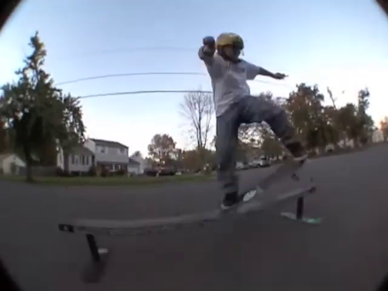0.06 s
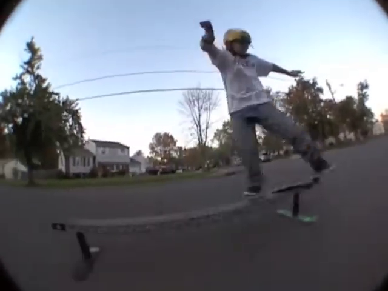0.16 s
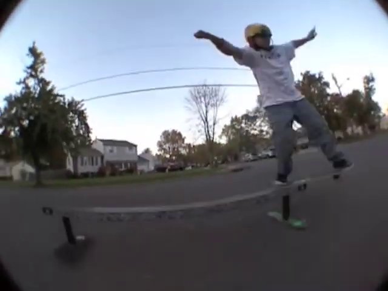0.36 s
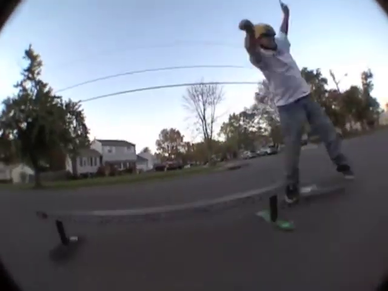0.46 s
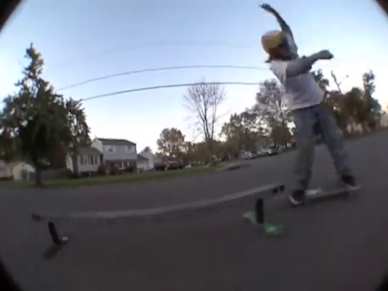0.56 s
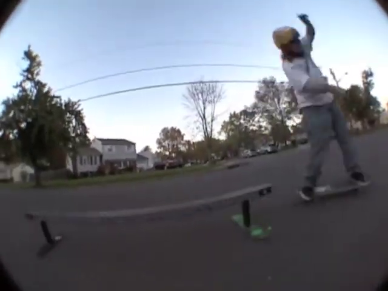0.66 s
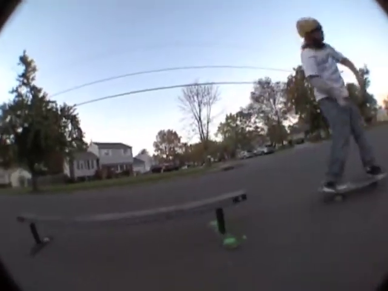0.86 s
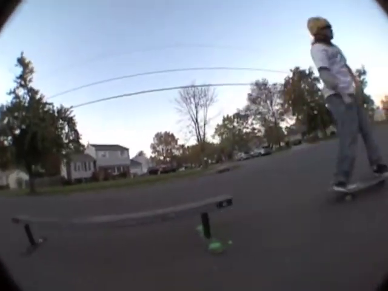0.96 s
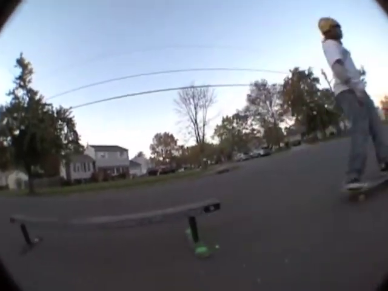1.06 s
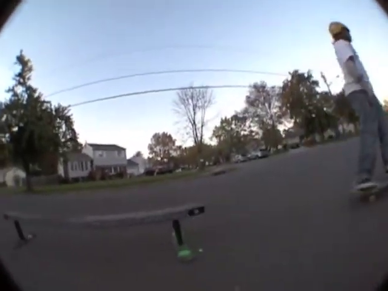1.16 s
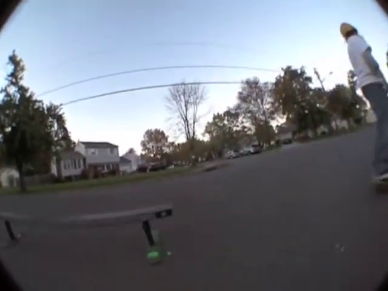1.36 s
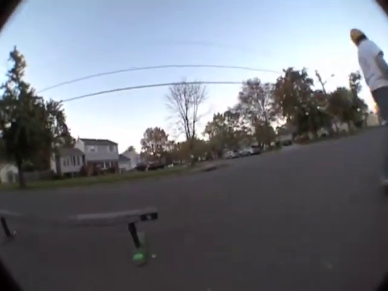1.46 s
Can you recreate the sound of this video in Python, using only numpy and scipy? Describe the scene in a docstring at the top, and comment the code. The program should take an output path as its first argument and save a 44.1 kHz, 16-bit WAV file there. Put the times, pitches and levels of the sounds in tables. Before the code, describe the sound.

A skateboard pops onto a steel rail with a woody knock, scrapes and squeals along it, then lands with a loud clatter. The rail rings on as the wheels roll away over rough asphalt on an open street.

```python
"""A woody knock sounds as a skateboard pops up onto a steel rail; it scrapes along, squealing where it
sticks. Two hollow thumps follow, then it slams off the end and lands with a clatter that overloads the
microphone. The rail rings on in its normal modes while the wheels roll away to the right over rough
asphalt. Friction and impact excite the steel and the deck; the street returns thin echoes."""
import sys
import numpy as np
from scipy import signal
from scipy.fft import rfft, irfft
from scipy.io import wavfile

SR = 44100
rng = np.random.default_rng(int(sys.argv[2]) if len(sys.argv) > 2 else 0)


def master_out(mix):
    """Clip the mix to full scale and print it as 16-bit PCM to the path in sys.argv[1]."""
    frames = np.transpose(np.atleast_2d(mix))
    ceiling = np.clip(frames, -1, 1)
    pcm = np.round(ceiling * 32767).astype(np.int16)
    wavfile.write(sys.argv[1], SR, pcm)


N = 66150
T = np.arange(N) / SR

# Levels are relative within each table.
# Scrapes on the rail; clatter of the landing: t/s, length/s, level/dB, change over length/dB, treble/dB
SCRAPES = [(.165, 0.023, -33.5, 9, -12), (.186, 0.026, -17, -2.5, -4.5), (.213, 0.014, -10.5, 1, 2.5),
           (.232, 0.017, -12, -3, 1), (.246, 0.029, -18.5, 7, 0), (.276, 0.016, -20, -11, 6),
           (.287, 0.05, -25, -7, 3), (.327, 0.0094, -17, 7, 3.5), (.343, 0.018, -18, 3.5, 3.5),
           (.3585, 0.015, -14, -4.5, 8.5), (.372, 0.035, -23.5, -1.5, 7.5), (.424, 0.04, -18.5, -1, 0),
           (.473, 0.074, -23, -6.5, -2)]
CLATTER = [(.5602, 0.037, -3.5, -5, 4.5), (.604, 0.056, -13, 0, 6), (.673, 0.028, -12.5, 3.5, -1.5),
           (.709, 0.034, -17, -7, 3)]
# Resonances of the sliding metal truck: f/Hz, bandwidth/Hz, gain/dB
TRUCK_RESONANCES = [(2860, 72, -2.5), (3210, 110, -6.5), (3660, 93, -8), (4450, 44, 0), (6120, 90, 5.5),
                    (6770, 110, -3), (7580, 150, -6), (8870, 250, -3.5), (9630, 96, 4.5),
                    (11700, 400, -10.5)]
# Strong modes of the rail: f/Hz, T60/s, gain when scraped/dB, gain when slammed/dB
RAIL_MODES = [(510, 1.1, -26, -25), (533, .7, -27, -31), (697, 1.0, -25, -28), (731, .9, -27, -20),
              (790, .3, -23, -28), (812, .25, -23, -34), (851, 1.1, -22, -19), (905, 1.1, -28, -23),
              (947, .75, -17, -17), (1018, 1.5, -31, -27), (1262, .6, -25, -24), (1431, .22, -18, -15),
              (1621, 1.7, -31, -26), (1801, .6, -25, -16.5), (1955, 1.3, -30, -28), (1986, 1.3, -25, -18),
              (2013, .9, -24, -25), (2044, .7, -28, -21), (2083, .35, -20, -15), (2194, .4, -22, -13),
              (2335, .4, -21, -21), (2386, .65, -20, -19), (2500, .55, -19, -18), (2724, .3, -23, -20),
              (2978, .7, -25, -23), (3161, .25, -20, -21), (3528, .3, -25, -20), (4248, .45, -30, -24)]
# Spectrum of the rail's weak modes: f/Hz, level/dB
SHIMMER_SPECTRUM = [(100, -42), (400, -38), (700, 1), (1500, 3.5), (2200, -2.5), (3100, 1), (4300, -1),
                    (5500, 4.5), (15000, -1)]
# Their decay: f/Hz, T60/s
SHIMMER_DECAY = [(500, 1.02), (2000, 0.83), (4000, 0.66), (7000, 0.3), (14000, 0.34)]
# Stick-slip notes; one note of the spinning wheels: t/s, length/s, f/Hz, level/dB
SQUEALS = [(0.213, 0.041, 2086, -20.5), (0.324, 0.0094, 3354, -22.5), (.33, 0.1, 1685, -23.5),
           (.345, 0.035, 2614, -29), (.33, 0.032, 2250, -35), (0.341, 0.037, 6510, -31.5),
           (0.492, 0.017, 1427, -24), (0.565, 0.013, 1431, -15.5), (0.568, 0.044, 2194, -19),
           (0.657, 0.024, 2082, -28.5), (0.678, 0.026, 2500, -38)]
WHINE = (-0.1, -0.01, 591, -40)
# Knocks of the deck: t/s, level/dB, treble/dB
KNOCKS = [(0.019, -19, 3), (.120, -32, -2), (0.1646, -20.5, -1.5), (0.232, -14.5, 18.5),
          (0.2801, -19.5, 20), (0.36, -20, 13), (0.5607, -9.5, 8), (.7672, -51, 7.5), (1.0843, -30.5, -2),
          (1.178, -28.5, 1), (1.312, -33.5, -3), (1.3311, -51, -11), (1.3996, -34, -14), (1.46, -36, -17)]
# Hollow thumps of the deck: t/s, level/dB, f/Hz
THUMPS = [(.4732, -8.5, 600), (.4998, -11.5, 517), (.520, -19, 524)]
# Rolling roar: t/s, level/dB, treble/dB, left over right/dB
ROLL = [(0, -35, 4.5, 0), (.15, -38, 0.5, -1.5), (.3, -38, 17, -2), (.54, -26.5, 10, -1), (.72, -41, 2, 0),
        (.9, -37.5, 3, -3), (1.08, -36.5, 6.5, -2.5), (1.22, -35.5, 7.5, -2), (1.36, -39, 4, -4),
        (1.5, -39, -1.5, -2.5)]
# Course of the wheels' drone; single cracks of grit: t/s, level/dB
DRONE = [(0, -55), (.16, -46), (.215, -30), (.32, -54), (.55, -58), (.62, -44), (.85, -43), (1.1, -49),
         (1.28, -46.5), (1.4, -42), (1.5, -43)]
GRIT = [(.862, -41), (0.883, -43), (.992, -47), (1.041, -45), (1.064, -41), (1.086, -47), (1.135, -53),
        (1.402, -43.5), (1.459, -40)]
# Noise spectra of the contacts: f/Hz, spectral level/dB
STEEL_SPECTRUM = [(30, -43), (100, -23.5), (250, -16), (450, -10), (800, -7), (1100, -10), (1600, -6),
                  (2300, -0.5), (3500, 0), (4000, -4.5), (5200, -12), (9800, -14.5), (13500, -19.5),
                  (16000, -39)]
WOOD_SPECTRUM = [(30, -34), (150, -14), (350, -0.5), (520, -4.5), (750, 0.5), (1300, 2.5), (2200, -5.5),
                 (3800, -13.5), (6000, -26.5), (15000, -37.5)]
ROAD_SPECTRUM = [(15, -88), (25, -57), (113, -6), (267, 1.5), (313, -20.5), (537, 4.5), (684, -4.5),
                 (919, 1), (1450, -4), (1950, -2), (2230, -9.5), (3170, -14), (4140, -29), (6550, -28.5),
                 (8570, -39.5), (10300, -33), (15500, -49)]
DRONE_SPECTRUM = [(20, -22), (60, -6), (120, -6), (200, 3.5), (260, 1.5), (340, 1.5), (700, -11),
                  (3000, -40)]
GRIT_SPECTRUM = [(100, -38.5), (2500, -8), (7000, 15), (11000, 2.5), (16000, -10)]
# Likeness of left and right: f/Hz, correlation/1
COHERENCE = [(60, 0.23), (250, 0.61), (900, 0.8), (2000, 0.84), (4000, 0.55), (12000, 0.23)]


def rough_contact(events, rise_s, t60, grain_db, chatter_db, chatter_hz):
    """Rough contact radiates chattering noise; events add in power. Returns sound and force envelope."""
    body, treble = noise(STEEL_SPECTRUM, grain_db)
    strokes = [(amp(db) * envelope(start, length, rise_s, t60, change_db), treble_db)
               for start, length, db, change_db, treble_db in events]
    force = np.sqrt(sum(level ** 2 for level, _ in strokes))
    edge = np.sqrt(sum((level * amp(treble_db)) ** 2 for level, treble_db in strokes))
    chatter = unit(amp(chatter_db * wander(chatter_hz)))
    return (body * force + treble * edge) * chatter, force


def truck(grind):
    """Resonance: the metal truck favours the bands of the scrape near its natural frequencies."""
    return sum(amp(db) * signal.lfilter(*signal.iirpeak(hz, hz / width, SR), grind)
               for hz, width, db in TRUCK_RESONANCES)


def rail_modes(scrape_force, slam_force):
    """Normal modes store energy and lose it exponentially: rough while driven, cleaner when free."""
    ring = np.zeros((2, N))
    for hz, t60, scrape_db, slam_db in RAIL_MODES:
        retained = np.exp(-2 * np.log(1000) / (t60 * SR))
        drive = (scrape_force * amp(scrape_db)) ** 2 + (slam_force * amp(slam_db)) ** 2
        energy = signal.lfilter([1 - retained], [1, -retained], drive)
        waver = .2 + .9 * drive / (drive + energy + 1e-12)
        ring += np.sqrt(energy) * tone(hz, waver, waver_hz=21.1, spread_rad=.24)
    return ring * amp(2.5)


def rail_shimmer(contact):
    """Dense weak modes of the tube merge into a noisy impulse response; damping takes the highs first."""
    excitation = sum(noise(SHIMMER_SPECTRUM, grain_db=0))[:, :SR]
    hz, t, spectra = signal.stft(excitation, SR, nperseg=256)
    decay = amp(-60 * t / at_frequency(SHIMMER_DECAY, hz)[:, None])
    response = signal.istft(spectra * decay, SR, nperseg=256)[1]
    return signal.fftconvolve(contact.mean(0)[None], response / np.linalg.norm(response[0]), axes=1)[:, :N]


def squeals():
    """Stick-slip friction locks onto one note, which then decays freely."""
    return sum(amp(db) * envelope(start, length, rise_s=.005, t60=.33)
               * tone(hz, waver=.25, waver_hz=60, spread_rad=.2) for start, length, hz, db in SQUEALS)


def knocks():
    """A short impact excites a broad band: a woody crack, then a brief rattle of the deck."""
    body, treble = noise(WOOD_SPECTRUM, grain_db=-5)
    crack = sum(amp(db) * (body + amp(treble_db) * treble) * envelope(start, .00081, rise_s=.0017, t60=.057)
                for start, db, treble_db in KNOCKS)
    rattle = sum(amp(db) * envelope(start, .013, rise_s=.0037, t60=.036) for start, db, _ in KNOCKS)
    return crack + amp(-10) * rattle * noise(WOOD_SPECTRUM, grain_db=-2.5)[0]


def thumps(rise_s=.0029, low_hz=254, low_db=-9.5):
    """Damped oscillation: soft blows swing the deck at two frequencies for a few cycles."""
    deck = np.zeros(N)
    for start, db, hz in THUMPS:
        t = np.maximum(T - start, 0)
        swell = (t / rise_s * np.exp(1 - t / rise_s)) ** 1.4
        swing = np.sin(2 * np.pi * hz * t) + amp(low_db) * np.sin(2 * np.pi * low_hz * t)
        deck -= amp(db) * swell * swing
    return pan(deck, db=-5.5)


def wheels():
    """Surface roughness excites rolling wheels into a roar and a drone; grit cracks under them."""
    times, db, treble_db, left_db = np.transpose(ROLL)
    body, treble = noise(ROAD_SPECTRUM, grain_db=2.5)
    brightness = amp(np.interp(T, times, treble_db) + 1.7 * wander(90))
    level = amp(np.interp(T, times, db) + .58 * wander(37))
    roar = (body + treble * brightness) * level
    drone = sum(noise(DRONE_SPECTRUM, grain_db=5.5)) * amp(np.interp(T, *np.transpose(DRONE)))
    cracks = sum(amp(db) * envelope(start, .00053, rise_s=.0004, t60=.012) for start, db in GRIT)
    grit = sum(noise(GRIT_SPECTRUM, grain_db=0)) * cracks
    return pan(roar + drone + grit, np.interp(T, times, left_db))


def wheel_whine():
    """Free decay: a faint note of the spinning wheels is already dying away at the start."""
    start, length, hz, db = WHINE
    level = amp(db) * envelope(start, length, rise_s=.022, t60=.33)
    return level * tone(hz, waver=1.3, waver_hz=45.6, spread_rad=.18)


def street_echoes(sound, t60, rise_s):
    """Reverberation: reflections from ground and houses build up, then decay exponentially."""
    t = T[:SR // 2]
    tail = rng.standard_normal((2, len(t))) * amp(-60 * t / t60) * np.minimum(t / rise_s, 1) ** 2
    return signal.fftconvolve(sound, tail / np.linalg.norm(tail[0]), axes=1)[:, :N]


def noise(spectrum, grain_db, crossover_hz=4200):
    """Random modulation makes coloured stereo noise grainy. Returns its body and its treble."""
    hz = np.fft.rfftfreq(N, 1 / SR)
    mid, side = rfft(rng.standard_normal((2, N)) * amp(grain_db * np.clip(wander(900), -2, 2)))
    coherence = np.clip(at_frequency(COHERENCE, hz), 0, 1)
    stereo = np.sqrt(1 + coherence) * mid + np.array([[1], [-1]]) * np.sqrt(1 - coherence) * side
    coloured = stereo * amp(at_frequency(spectrum, hz))
    whole = irfft(coloured, N)
    treble = irfft(coloured / (1 + (crossover_hz / (hz + 1)) ** 4), N)
    return (whole - treble) / whole.std(), treble / whole.std()


def tone(hz, waver, waver_hz, spread_rad):
    """A sinusoid with random amplitude and phase modulation, slightly out of phase between channels."""
    phase = 2 * np.pi * (hz * T + rng.random()) + spread_rad * rng.standard_normal() * np.array([[1], [-1]])
    stray = wander(waver_hz) + 1j * wander(waver_hz)
    return ((np.sqrt(2) + waver * stray) * np.exp(1j * phase)).real / np.sqrt(1 + waver ** 2)


def envelope(start, length, rise_s, t60, change_db=0):
    """Linear attack, sloping hold and exponential decay."""
    t = T - start
    db = change_db * np.clip(t / length, 0, 1) - 60 * np.maximum(t - length, 0) / t60
    return np.clip(t / rise_s, 0, 1) * amp(db)


def wander(rate_hz):
    """Low-pass random motion of unit rms."""
    hz = np.fft.rfftfreq(N, 1 / SR)
    return unit(irfft(rfft(rng.standard_normal(N)) / (1 + (hz / rate_hz) ** 4), N))


def pan(x, db):
    """Level difference: left exceeds right by db."""
    return x * amp(np.array([[.5], [-.5]]) * db)


def at_frequency(points, hz):
    """Interpolation on a log-frequency axis."""
    f, value = np.transpose(points)
    return np.interp(np.log(hz + 1), np.log(f + 1), value)


def amp(db):
    """Decibels to amplitude ratio."""
    return 10 ** (np.asarray(db) / 20)


def unit(x):
    """Normalisation to unit rms."""
    return x / np.sqrt(np.mean(x ** 2) + 1e-20)


def scene():
    """Superposition of grind, landing and roll-away in the open street."""
    grind, scrape_force = rough_contact(SCRAPES, rise_s=.0024, t60=.051,
                                        grain_db=1, chatter_db=-2, chatter_hz=170)
    landing, slam_force = rough_contact(CLATTER, rise_s=.001, t60=.09,
                                        grain_db=2.5, chatter_db=1.5, chatter_hz=130)
    contact = grind * amp(-4) + truck(grind) * amp(-2) + landing * amp(-3)
    shimmer = rail_shimmer(grind * amp(-9) + landing * amp(-11.5))
    steel = contact + shimmer + rail_modes(scrape_force, slam_force) + squeals()
    direct = pan(steel, db=2) + knocks() + thumps()
    return direct + amp(-19) * street_echoes(direct, t60=.43, rise_s=.0031) + wheels() + wheel_whine()


def record(dry, low_cut_hz=92, asymmetry=.023, band_limit_hz=15700):
    """Saturation: the small microphone loses bass, clips the landing unevenly and limits the band."""
    thin = signal.sosfilt(signal.butter(2, low_cut_hz, "highpass", fs=SR, output="sos"), dry)
    ceiling = 1 + asymmetry * np.sign(thin)
    clipped = thin / (1 + (thin / ceiling) ** 6) ** (1 / 6)
    lowpass = signal.firwin(255, band_limit_hz, window=("kaiser", 8), fs=SR)
    return signal.oaconvolve(clipped, lowpass[None], "same")


dry = scene()
out = record(dry)
master_out(out)
```